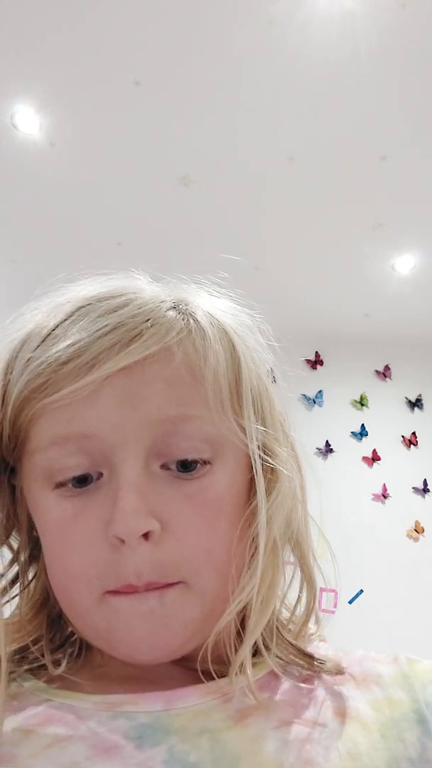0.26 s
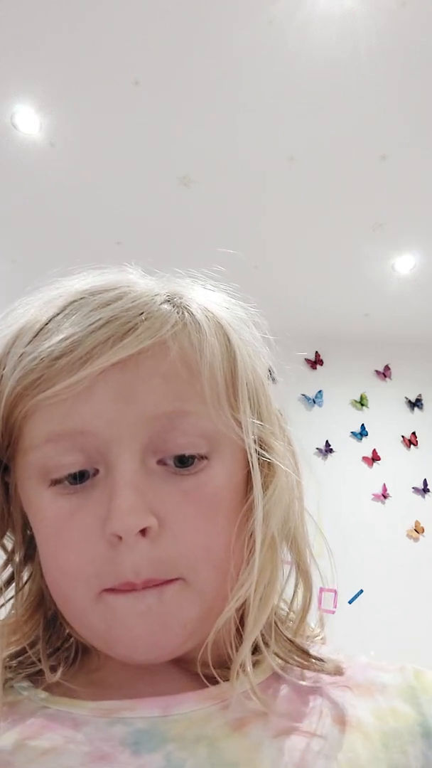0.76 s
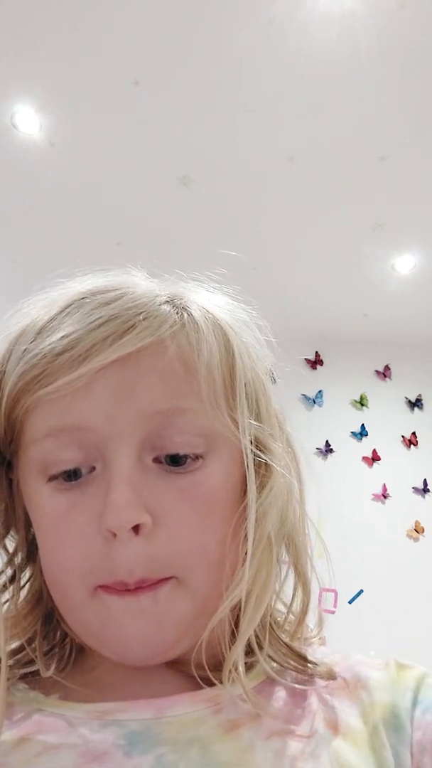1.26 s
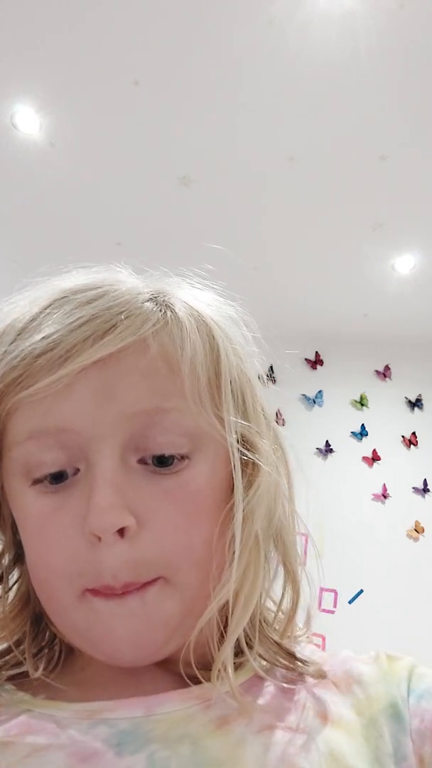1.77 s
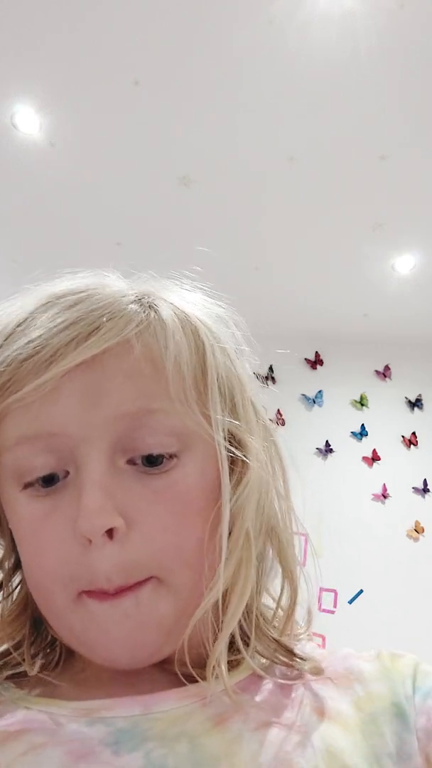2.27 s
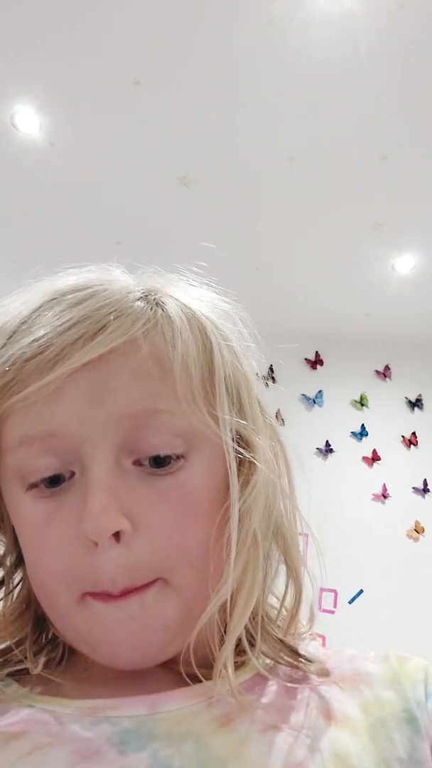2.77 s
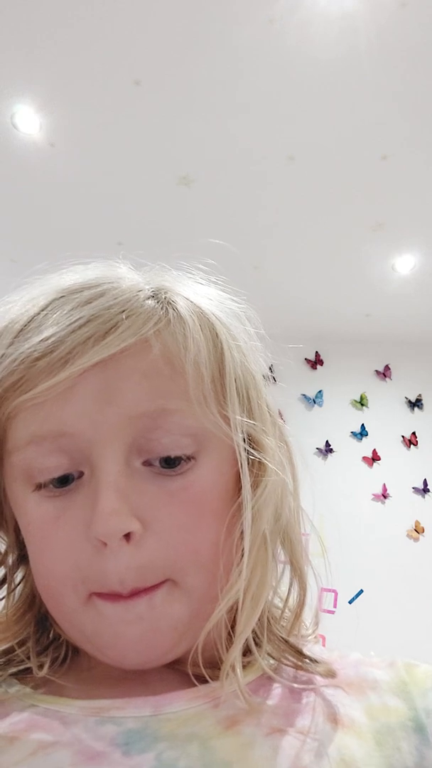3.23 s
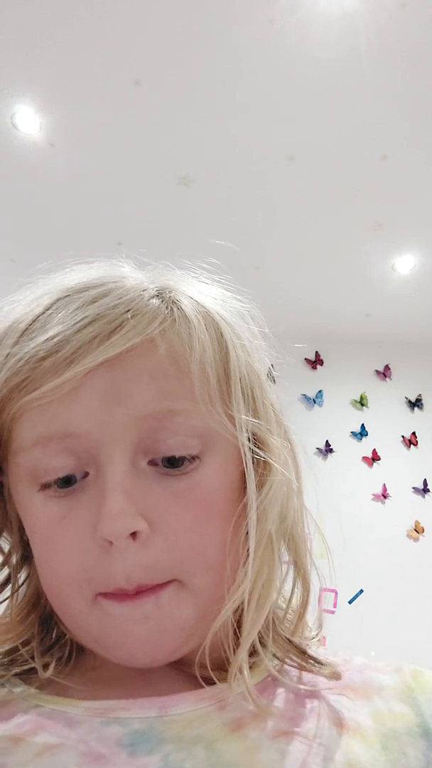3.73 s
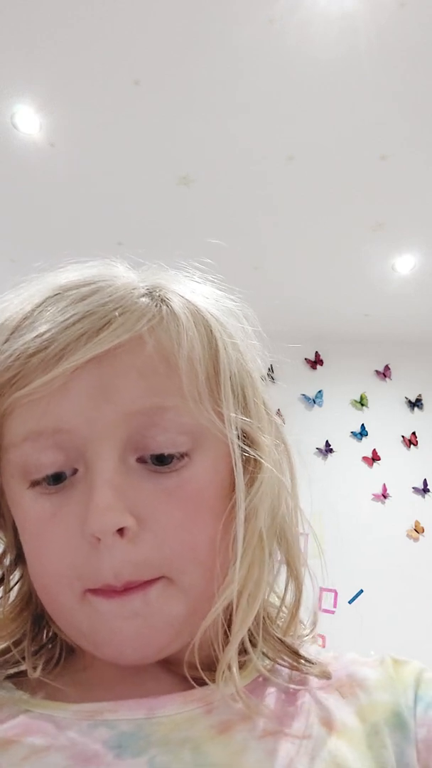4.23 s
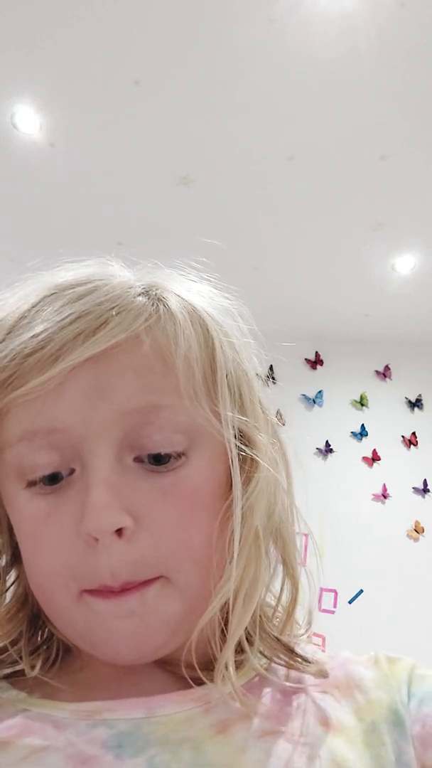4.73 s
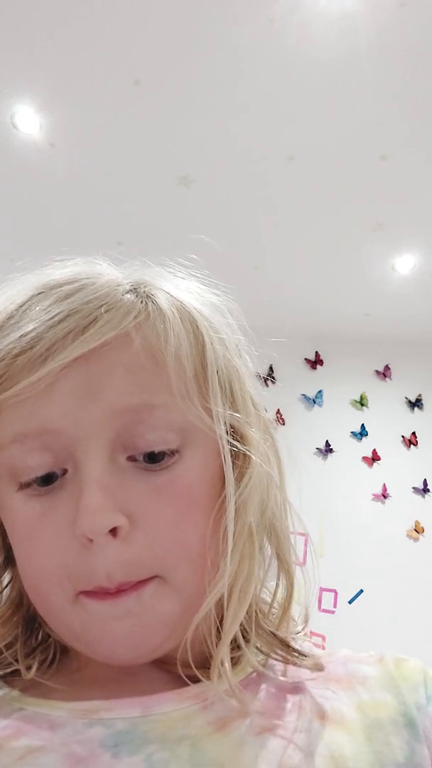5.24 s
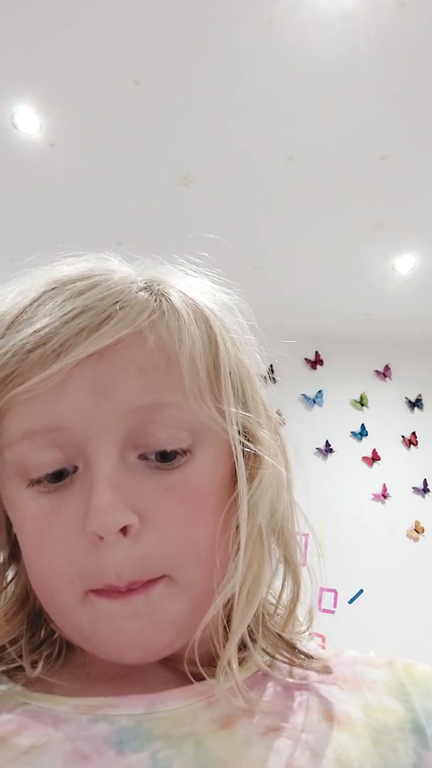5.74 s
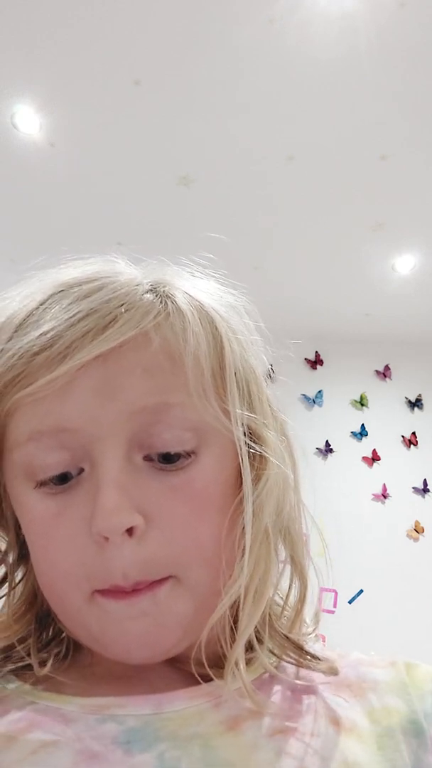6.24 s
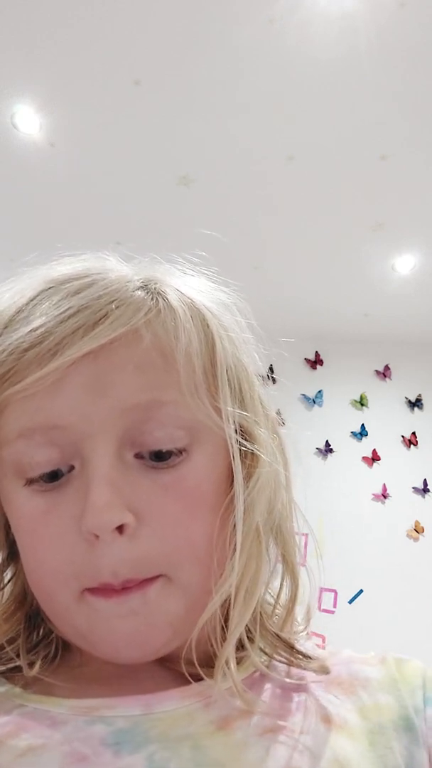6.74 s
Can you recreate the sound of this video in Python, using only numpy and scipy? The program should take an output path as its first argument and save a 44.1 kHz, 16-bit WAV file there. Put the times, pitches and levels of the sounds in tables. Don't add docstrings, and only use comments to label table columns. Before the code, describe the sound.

A faint room hush opens with a dull drag and light click, then small hollow plastic toys are slammed on a table about every half second. Each slam is a hard tick, brief hollow ring and low board thud. Quieter taps, knocks and scrapes fill the gaps. The phone lies on the same table, very close, with contacts to the right and a short faint room echo.

```python
import sys
import numpy as np
from scipy import signal
from scipy.fft import rfft, irfft
from scipy.io import wavfile
from scipy.ndimage import uniform_filter1d, minimum_filter1d

SR = 44100
rng = np.random.default_rng(int(sys.argv[2]) if len(sys.argv) > 2 else 0)


def amp(db):
    return 10 ** (np.asarray(db, float) / 20)


def write(x):
    x = np.atleast_2d(x).T
    wavfile.write(sys.argv[1], SR, np.round(np.clip(x, -1, 1) * 32767).astype(np.int16))


N = 308700
SPAN = 12288
LEAD = 512
AGE = np.arange(SPAN) / SR


def colour(x, points):
    hz, db = np.transpose(points)
    f = np.fft.rfftfreq(x.shape[-1], 1 / SR)
    gain = amp(np.interp(np.log(f + 1), np.log(hz), db))
    return irfft(rfft(x) * gain, x.shape[-1])


def unit(x, size):
    return x / np.sqrt(np.mean(x[..., :size] ** 2, axis=-1, keepdims=True))


def hush():
    # pitch_hz, level_db (per Hz)
    hush_colour = [(18, -38), (40, -9.5), (70, -5), (200, -3), (420, -6), (700, -16.5), (1500, -22),
                   (2500, -24), (4000, -32), (6000, -35), (10000, -34.5), (15800, -37.5)]
    air = unit(colour(rng.standard_normal((2, N)), hush_colour), size=N)
    steps = np.repeat(rng.standard_normal(N // 4410 + 1), 4410)
    swell = uniform_filter1d(steps, 4410)[:N]
    side_db = np.array([[-2.5], [2.5]])
    return air * amp(-71 + 0.5 + 2.4 * swell + side_db)


def slides():
    # pitch_hz, level_db
    dull_colour = [(150, -12.5), (500, 5.5), (1100, -7.5), (2200, -10), (3500, -22), (8000, -42.5)]
    # pitch_hz, level_db
    bright_colour = [(300, -8), (1000, -6), (2200, -1.5), (3500, -11.5), (4500, -15), (5500, -9),
                     (7000, -23), (14000, -35)]
    # start_s, level_db
    skids = [
        (.93, -61),
        (1.538, -58),
        (3.426, -56.5),
        (4.26, -51),
        (4.859, -52),
        (5.191, -55.5),
        (6.06, -61),
        (6.529, -51),
        (6.818, -56.5),
    ]
    # start_s, level_db
    scrapes = [
        (1.372, -45.5),
        (2.889, -51),
        (3.261, -47),
        (4.74, -39.5),
        (5.06, -43.5),
        (6.467, -45),
    ]
    # start_s, length_s, level_db
    drags = [(.005, 0.057, -45.5), (.43, 0.028, -60.5), (1.237, 0.12, -60.5), (1.642, 0.044, -57),
             (1.95, 0.088, -62.5), (2.251, .06, -50.5), (2.609, 0.068, -46), (2.79, 0.11, -61.5),
             (3.03, 0.031, -51), (3.764, 0.035, -63.5), (4.049, 0.22, -47.5), (4.383, 0.039, -67),
             (4.634, 0.061, -48.5), (5.507, 0.059, -46.5), (5.641, 0.057, -54.5), (5.744, 0.051, -46.5),
             (5.879, 0.1, -55.5)]
    skid_s, scrape_s = 0.037, 0.033
    skid_bright, scrape_bright, drag_bright = 1, 0.4, 0.18

    grain_size = 128
    grain = amp(1.7 * rng.standard_normal(N // grain_size + 1).repeat(grain_size)[:N])
    dull = unit(colour(grain * rng.standard_normal((2, N)), dull_colour), size=N)
    bright = unit(colour(grain * rng.standard_normal((2, N)), bright_colour), size=N)

    moves = [(s, skid_s, db, skid_bright) for s, db in skids]
    moves += [(s, scrape_s, db, scrape_bright) for s, db in scrapes]
    moves += [(*drag, drag_bright) for drag in drags]
    out = np.zeros((2, N))
    t = np.arange(N) / SR
    for s, length, db, share in moves:
        grow = np.clip((t - s) / (0.61 * length), 0, 1)
        fade = np.clip((s + 1.616 * length - t) / length, 0, 1)
        out += amp(db) * grow * fade * ((1 - share) * dull + share * bright)
    side_db = np.array([[-9.0], [0]])
    return out * amp(side_db)


def contacts():
    # start_s, tick_db (peak), board_db, damping (1 = plain ring, lower swells
    clicks = [(.023, -45.5, -50, 1), (0.9465, -51, -52, 0.61), (1.6568, -50, -78, 0.63),
              (1.9394, -39.5, -42.5, 0.46), (2.248, -27.5, -33.5, 0.91), (4.2579, -32, -41, 0.68),
              (4.3803, -54, -73.5, 0.9), (4.8805, -27, -29, 0.94), (6.0693, -40.5, -51, 0.21),
              (6.5497, -50, -50.5, 0.73), (6.8393, -47, -51, 0.19)]
    # start_s, level_db, tick_db (peak), damping
    taps = [(0.171, -72.5, -71.5, 0.88), (0.4356, -61, -52, 0.69), (1.228, -46.5, -51, 0.46),
            (1.2707, -50.5, -55.5, .33), (1.537, -42.5, -42.5, 1), (2.004, -61.5, -63, 0.46),
            (2.0506, -55, -63.5, .42), (2.3734, -60, -65, .95), (2.593, -49.5, -56, 1),
            (2.6097, -44, -43, 0.96), (3.0378, -42, -38, 0.73), (3.431, -53, -57, 0.71),
            (3.7839, -46.5, -46.5, 0.66), (4.6211, -43, -41.5, 0.93), (5.655, -36, -47.5, 0.81),
            (5.9013, -29, -47, 0.82), (5.9197, -46.5, -49, .33), (6.4713, -30.5, -45, 0.83)]
    # start_s, board_db, tick_db (peak)
    thumps = [(0.2098, -35, -45), (1.3159, -41, -60), (2.313, -41.5, -50.5), (2.6585, -40.5, -47),
              (2.7744, -34, -53), (2.7897, -32, -53.5), (2.8315, -35, -50.5), (2.8818, -38, -49.5),
              (3.2201, -35.5, -41), (3.5801, -32.5, -46.5), (3.6314, -34.5, -25), (3.82, -59.5, -65.5),
              (4.6384, -31.5, -40.5), (4.9599, -48.5, -69), (5.3521, -29, -36.5), (5.364, -22.5, -48.5),
              (5.513, -35.5, -41.5), (5.6438, -36, -48.5), (5.7615, -40.5, -52), (5.8851, -42, -50),
              (6.1854, -60, -65), (6.452, -37.5, -39)]
    # start_s, tick_db (peak), shell_db, board_db, sizzle_db
    slams = [(0.2722, -9.5, -22, -23, -60), (0.8173, -3.5, -12, -27, -52.5),
             (1.402, -1.5, -18.5, -21.5, -57), (2.1199, -4.5, -14, -22, -60.5),
             (2.463, -0.5, -20.5, -17.5, -65.5), (2.917, -5, -13.5, -12.5, -64.5),
             (3.282, -9.5, -17.5, -24.5, -62.5), (3.639, -8.5, -18.5, -27.5, -67.5),
             (4.1527, -1.5, -14.5, -16.5, -62), (4.7566, -7.5, -13.5, -14.5, -56),
             (5.0824, -3, -20, -25.5, -70), (5.384, -6, -16, -13, -59.5), (6.007, -17.5, -18, -18, -68.5),
             (6.4813, -5.5, -20, -23.5, -50), (6.768, -4, -9, -12.5, -48.5)]
    # start_s, tick_db (peak), shell_db, board_db
    knocks = [
        (.7882, -26.5, -27.5, -21),
        (0.811, -17.5, -18, -21.5),
        (1.3583, -34.5, -38, -32.5),
        (1.3788, -47.5, -28.5, -28.5),
        (2.4469, -33, -31, -23.5),
        (3.2751, -35, -45, -28.5),
        (5.1812, -26, -24.5, -29.5),
        (6.4914, -27, -15.5, -18.5),
        (6.7388, -31, -24, -26),
        (6.7606, -22, -27.5, -28),
    ]
    # start_s, level_db, edge_earlier_ms, damping
    landings = [
        (1.727, -21, 7.6, 0.97),
        (2.0951, -22.5, 5.5, 0.44),
        (2.4161, -22.5, 5.9, 0.55),
        (4.1292, -25.5, 7.5, .93),
        (4.4373, -19.5, 7.3, 0.75),
        (4.7291, -24.5, 8.1, 0.52),
        (5.054, -21, 5.5, 0.69),
    ]
    # tick_db, shell_db, board_db
    face_db = np.array((-4.5, 0.45, -1.6))
    edge_db = np.array((-15, -14.5, -17.5))
    slam_damping, knock_damping, thump_damping, edge_damping = 1, 0.86, 0.78, 1

    rows = [(s, *(db + face_db), damping) for s, db, _, damping in landings]
    rows += [(s - ms / 1000, *(db + edge_db), edge_damping) for s, db, ms, _ in landings]
    rows += [(*knock, knock_damping) for knock in knocks]
    rows += [(s, tick_db, tick_db - 8, board_db, damping) for s, tick_db, board_db, damping in clicks]
    rows += [(s, tick_db, board_db - 9, board_db, thump_damping) for s, board_db, tick_db in thumps]
    rows += [(s, tick_db, db, db, damping) for s, db, tick_db, damping in taps]
    rows = [(s, tick_db, shell_db, board_db, -51 + 0.74 * tick_db, damping)
            for s, tick_db, shell_db, board_db, damping in rows]
    rows += [(*slam, slam_damping) for slam in slams]
    return sorted(rows)


def tick(clatter_db, travel_s, edge):
    # pitch_hz, level_db
    tick_colour = [(300, -18.5), (700, -0.5), (1300, 3.5), (2000, -2.5), (2600, -9.5), (3300, -17),
                   (4200, -22), (5200, -28), (6500, -49), (9000, -64)]
    draw = rng.standard_normal((len(edge), SPAN + 1))
    f = np.fft.rfftfreq(SPAN, 1 / SR)
    distance = travel_s * np.exp(0.25 * draw[:, :1])
    turns = f * LEAD / SR + distance * (2 * np.sqrt(1000 * f) - 0.5 * f)
    chirp = irfft(np.exp(-2j * np.pi * turns), SPAN)

    since = AGE - LEAD / SR
    age = since.clip(0)
    rattle = (age > 0) * (np.exp(-age / 0.002) + amp(clatter_db) * np.exp(-age / 0.027))
    graze = 0.013 * (age == 0) * np.exp(since.clip(None, 0) / 0.0015)
    out = colour(chirp + draw[:, 1:] * (0.035 * rattle + graze), tick_colour)

    mirror_s = 0.0004 * np.exp(0.36 * draw[:, 1:2])
    mirror = 1 + 0.55 * np.exp(-2j * np.pi * f * mirror_s)
    brightness = (1 + (f / 2500) ** 2) ** edge
    out = irfft(rfft(out) * mirror * brightness, SPAN)
    return out / np.abs(out).max(axis=1, keepdims=True)


def body(peaks, low_hz, high_hz, travel_s, likeness, hardness, count):
    # pitch_hz, t60_s (time to fall by 60 dB)
    ring_time = np.array([(50, 0.2), (130, 0.15), (350, 0.14), (920, 0.075), (2430, 0.054)])
    place = (np.arange(count) + rng.random(count)) / count
    hz = low_hz * (high_hz / low_hz) ** place
    power = sum(amp(2 * db) / (1 + (2 * (hz - f) / width) ** 2) for f, width, db in peaks)
    gain = np.sqrt(power * hz) / (1 + (hz / 2100) ** 3)

    t60 = np.interp(np.log(hz), np.log(ring_time[:, 0]), ring_time[:, 1])
    arrival = travel_s * np.sqrt(200 / hz)
    rise = 1 - np.exp(-(AGE / arrival[:, None]) ** 2)
    modes = rise * np.exp(-np.log(1000) * AGE / t60[:, None] + 2j * np.pi * hz[:, None] * AGE)

    gain = gain * (hz / 700) ** hardness
    draw = rng.standard_normal((len(hardness), 4, count))
    near = draw[:, 0] + 1j * draw[:, 1]
    other = draw[:, 2] + 1j * draw[:, 3]
    like = np.clip(likeness, 0, 1)
    far = like * near + np.sqrt(1 - like ** 2) * other
    both = (np.array([far, near]) * gain).astype(np.complex64) @ modes.astype(np.complex64)
    return unit(both.imag, size=882)


def sizzle(count):
    grit = rng.standard_normal((count, 2, SPAN)).transpose(1, 0, 2)
    rise = 1 - np.exp(-AGE / 0.00045)
    fade = np.exp(-AGE / 0.0047) + 0.11 * np.exp(-AGE / 0.021)
    tint = [(4500, -40), (6500, 1.0), (11000, -8.5), (16000, -12.5)]  # pitch_hz, level_db
    return unit(colour(grit * rise * fade, tint), size=441)


def toys():
    # pitch_hz, width_hz, level_db
    board_peaks = [(72, 35, -1), (123, 55, -7.5), (200, 32, 3.5), (286, 60, -4.5)]
    # pitch_hz, width_hz, level_db
    shell_peaks = [(430, 360, 0), (669, 460, 4), (940, 530, 3.5), (1296, 180, -12.5), (2220, 600, -15)]
    # pitch_hz, level_db
    far_shade = [(60, -11.5), (150, -10), (300, -14), (700, -20), (1300, -12), (2500, -10.5), (5000, -24.5),
                 (10000, -11.5)]
    far_lag = 15

    s, tick_db, shell_db, board_db, sizzle_db, damping = np.transpose(contacts())[:, :, None]
    hardness = np.clip(0.046 * (tick_db - shell_db - 7), -1.5, 0.3)
    edge = np.clip(0.084 * (sizzle_db - tick_db + 57.0), -1.5, 0.15)
    edge = edge + np.clip(0.022 * (tick_db + 26.0), -1.2, 0)

    thud = body(board_peaks, 55, 400, 0.0038, 0.9, 0 * hardness, count=26)
    hollow = body(shell_peaks, 380, 4500, 0.0024, 0.16, hardness, count=60)
    ring = amp(board_db + 0.24) * thud + amp(shell_db - 2.1) * hollow
    ring = ring * np.exp(-(damping.clip(0, 1) - 1) * AGE.clip(0, 0.12) / 0.025)
    ring = ring + amp(sizzle_db + 3.5) * sizzle(count=len(s))

    each = np.roll(ring * (1 - AGE / AGE[-1]), LEAD, axis=2)
    each = each + amp(tick_db + 2.0) * tick(-20, 0.002173, edge)
    each = each * signal.windows.tukey(SPAN, 0.02)
    out = np.zeros((2, N + SPAN))
    for k, start in enumerate((s[:, 0] * SR).astype(int)):
        out[:, start:start + SPAN] += each[:, k]
    far = np.roll(colour(out[0], far_shade), far_lag)
    return np.array([far, out[1]])[:, LEAD:N + LEAD]


def room(x, t60, wet_db):
    fade = np.exp(-np.log(1000) * AGE / t60) * (1 - np.exp(-AGE / 0.0087))
    tail = rng.standard_normal((2, SPAN)) * fade
    tail = colour(tail, [(60, -6.0), (300, -10.5), (2000, -5.5), (5000, -6), (16000, -20.0)])
    tail = tail / np.sqrt(np.sum(tail ** 2, axis=1, keepdims=True))
    side_db = np.array([[-6.0], [0]])
    return amp(wet_db + side_db) * signal.fftconvolve(x[None], tail, axes=1)[:, :N]


def scene():
    near = toys() + slides()
    return near + room(near[1], 0.26, -26.0) + hush()


def low_pass(x):
    return signal.sosfilt(signal.butter(12, 16000, fs=SR, output="sos"), x)


def record(dry):
    bass_cut = signal.butter(3, 48, "highpass", fs=SR, output="sos")
    cut = signal.sosfilt(bass_cut, dry)
    peak_gain = minimum_filter1d(1 / np.abs(cut).clip(0.97), size=257)
    held = cut * uniform_filter1d(peak_gain, size=129)
    top_cut = signal.ellip(8, 0.2, 60, 15750, fs=SR, output="sos")
    return low_pass(signal.sosfilt(top_cut, held))


dry = scene()
out = record(dry)
write(out)
```